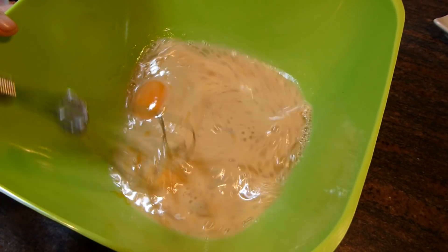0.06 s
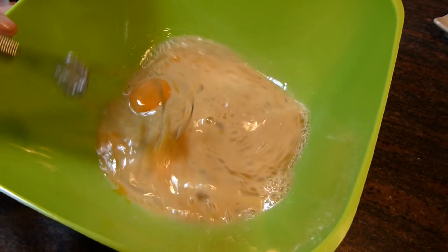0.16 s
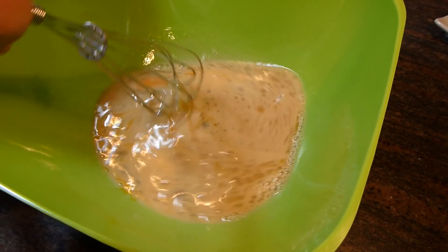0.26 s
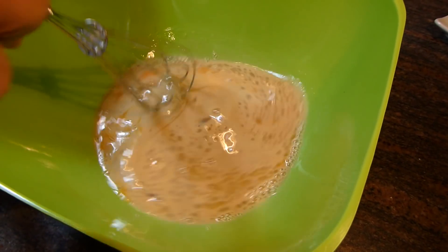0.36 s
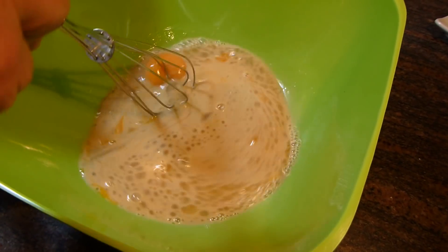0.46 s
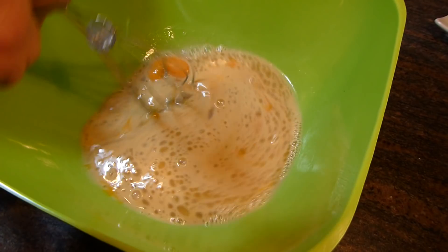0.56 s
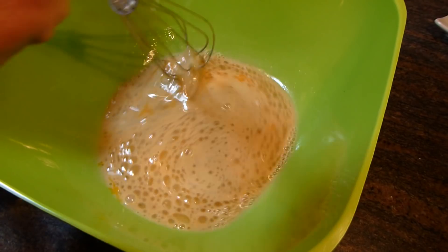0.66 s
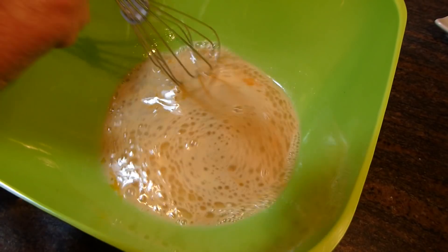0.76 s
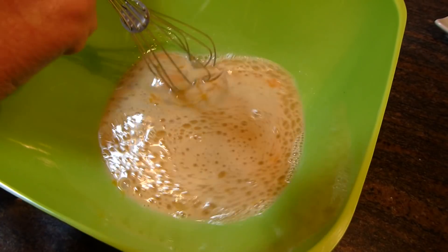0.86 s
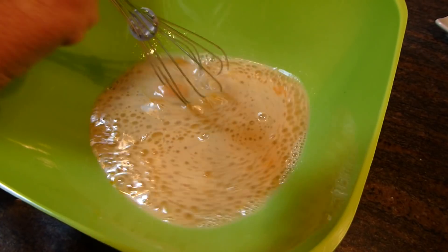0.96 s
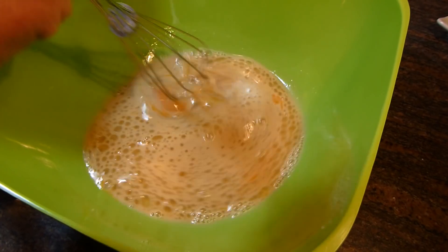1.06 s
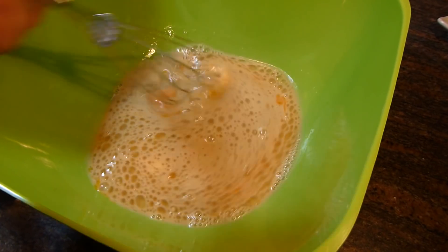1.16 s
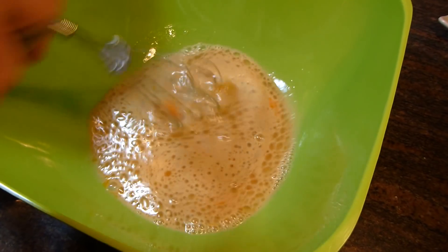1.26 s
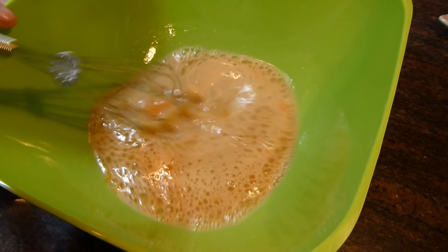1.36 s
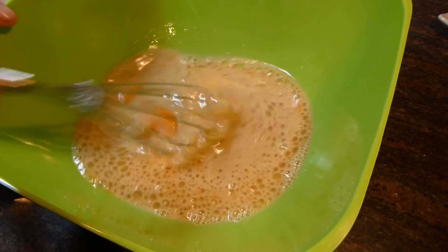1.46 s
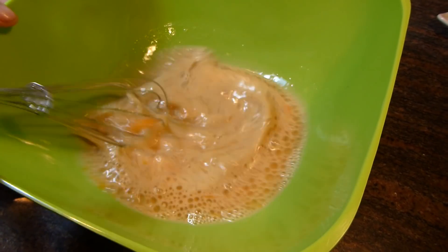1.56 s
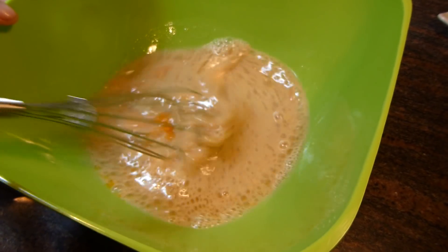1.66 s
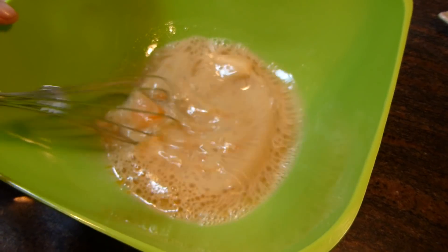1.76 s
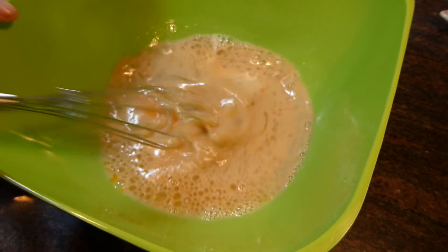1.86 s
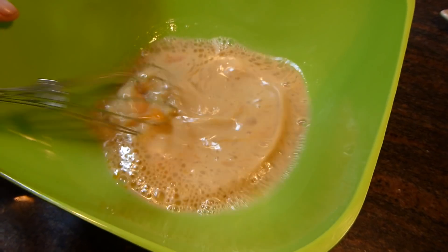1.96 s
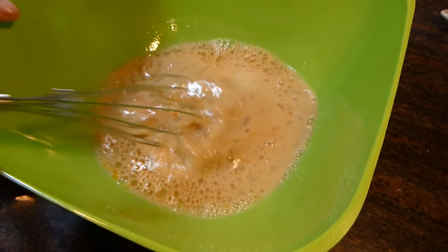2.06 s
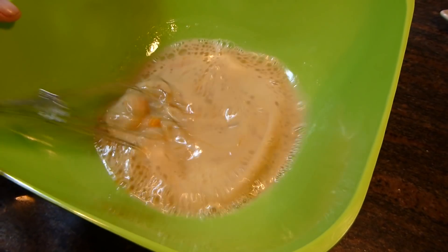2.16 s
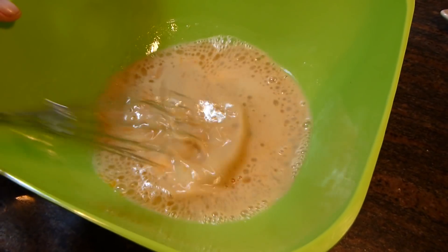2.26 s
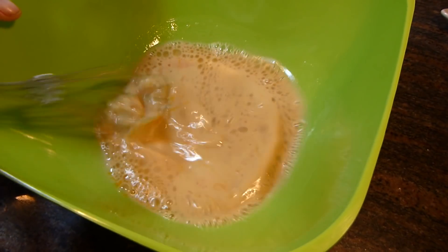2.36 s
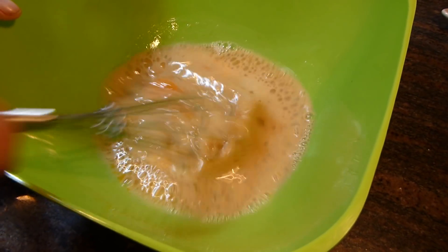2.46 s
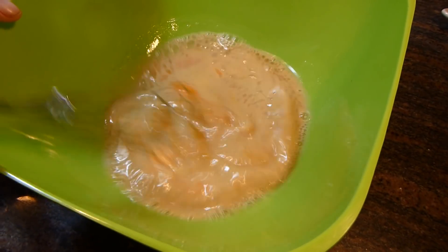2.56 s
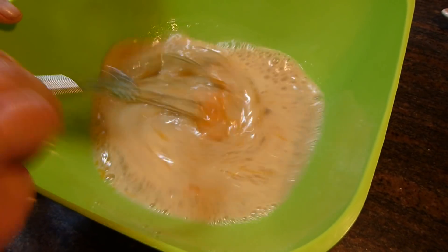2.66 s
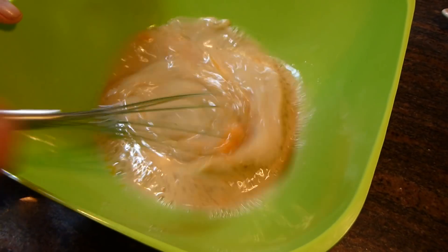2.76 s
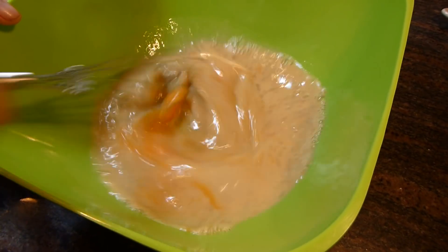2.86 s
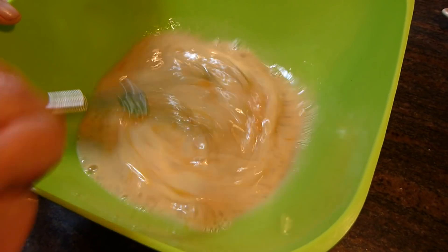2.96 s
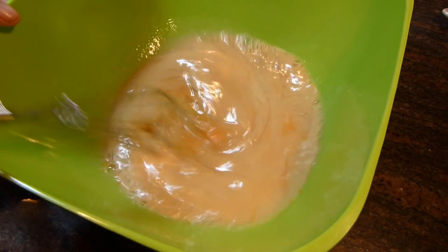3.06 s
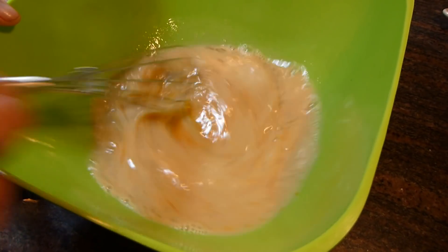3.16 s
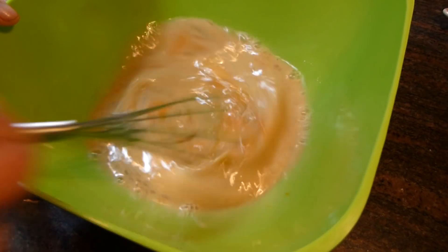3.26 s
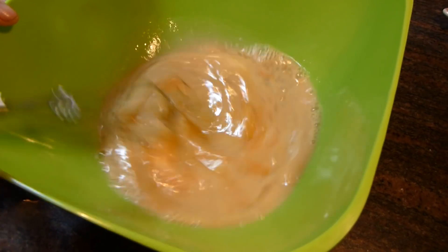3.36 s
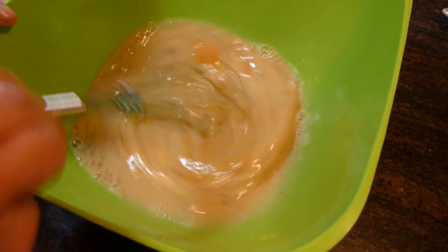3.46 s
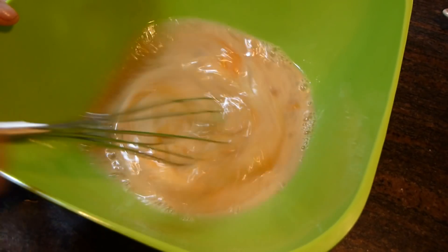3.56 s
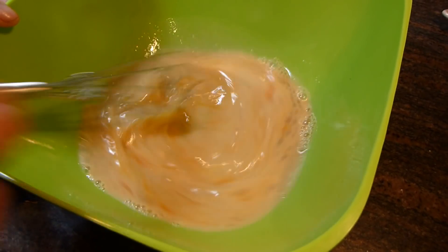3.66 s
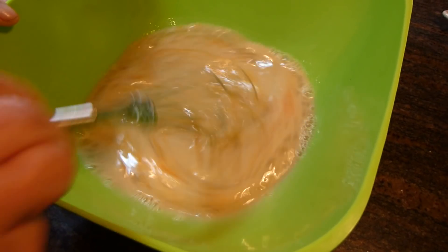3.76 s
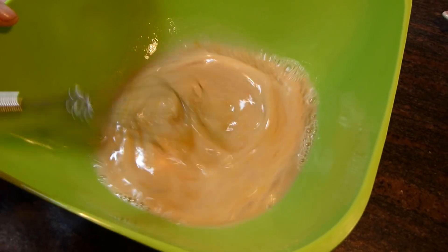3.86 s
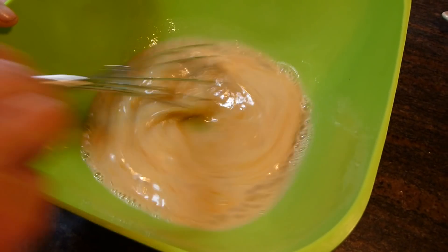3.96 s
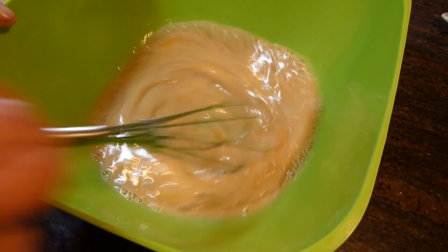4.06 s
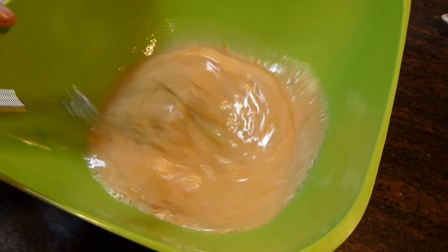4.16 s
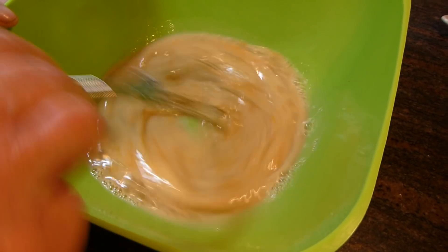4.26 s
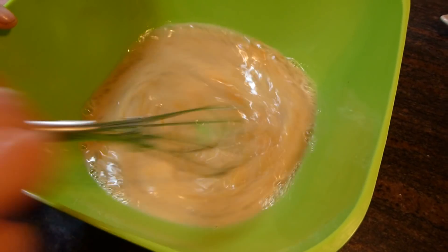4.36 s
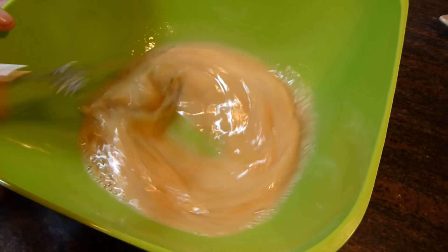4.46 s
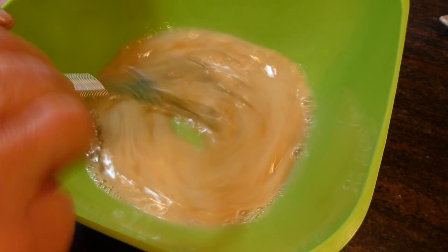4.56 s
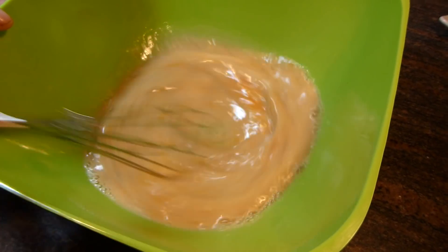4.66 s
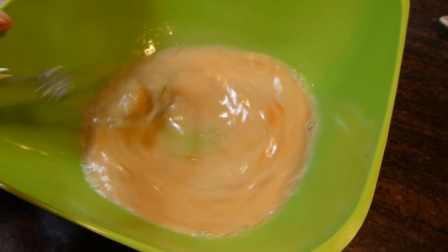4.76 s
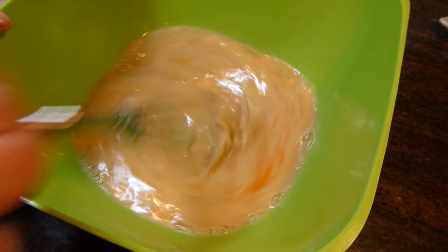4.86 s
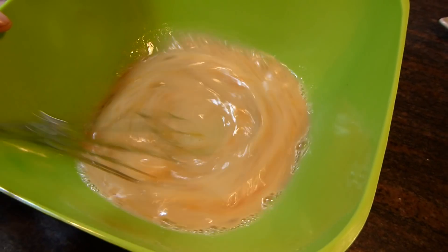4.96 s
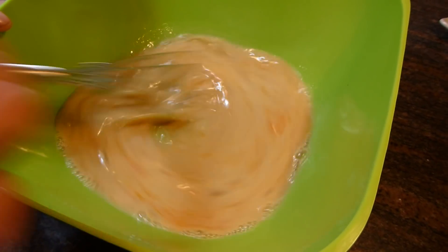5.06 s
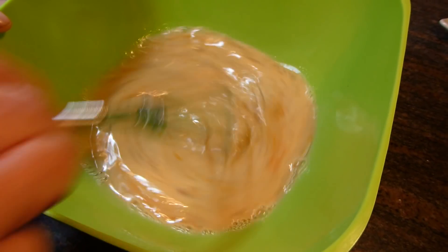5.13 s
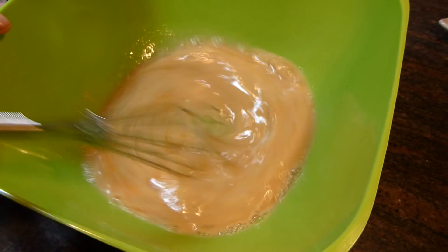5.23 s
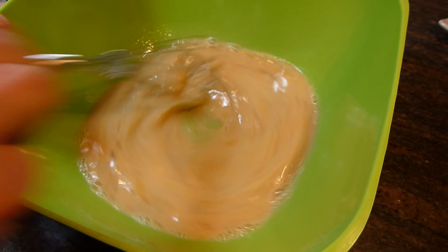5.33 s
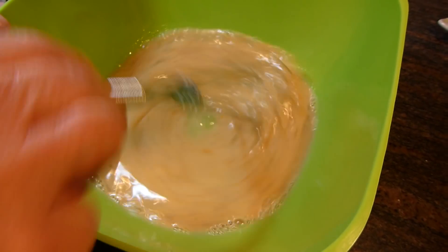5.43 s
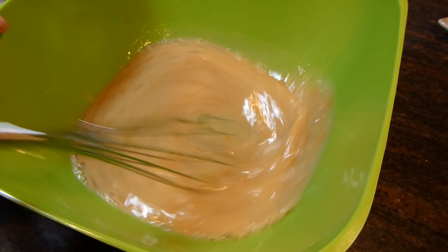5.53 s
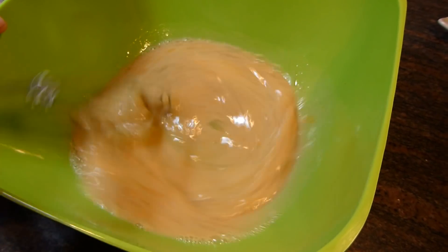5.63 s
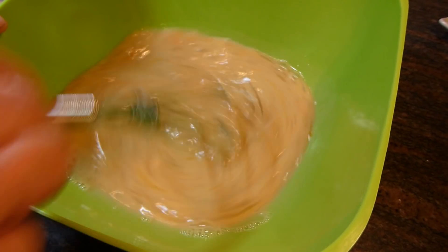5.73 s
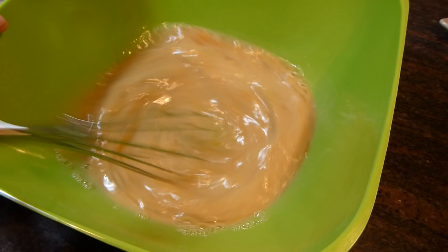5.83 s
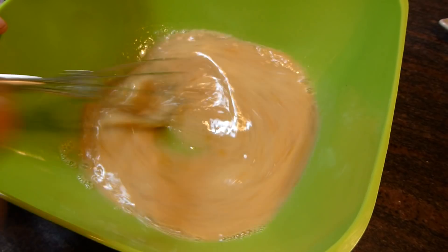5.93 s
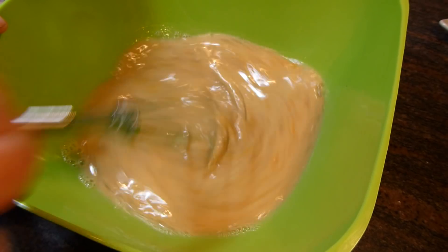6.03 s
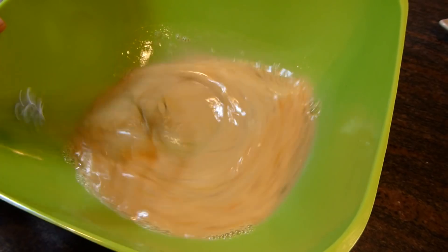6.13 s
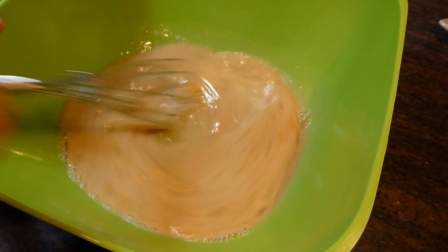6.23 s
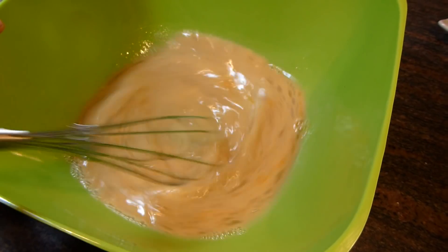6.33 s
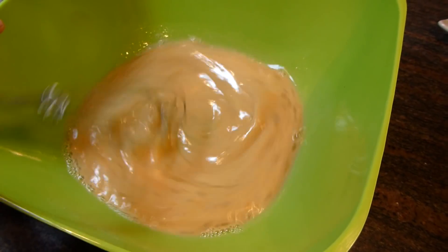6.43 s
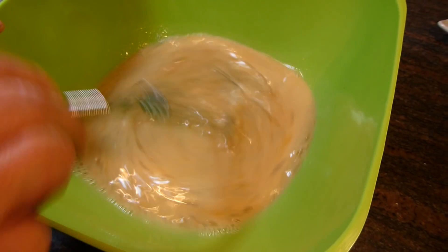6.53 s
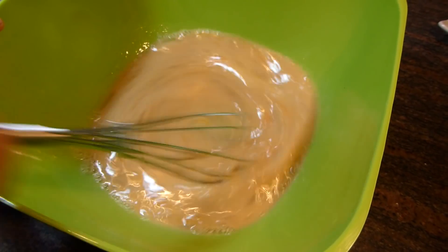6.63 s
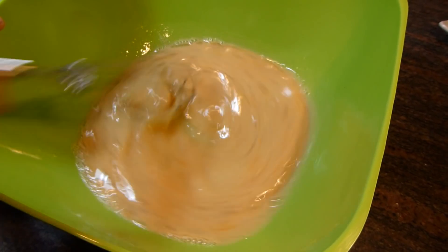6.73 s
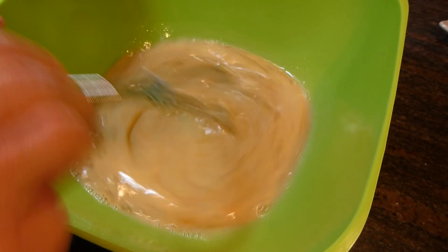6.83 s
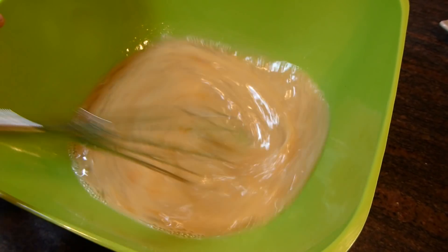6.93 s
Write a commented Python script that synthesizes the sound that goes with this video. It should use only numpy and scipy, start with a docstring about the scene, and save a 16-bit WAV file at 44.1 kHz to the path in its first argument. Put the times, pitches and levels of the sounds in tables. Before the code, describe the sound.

Close up in a small quiet kitchen, a wire whisk knocks a plastic bowl once, nearly pauses, then starts beating thin batter. Thin metallic scraping swells and fades about seven times a second, with irregular hollow knocks, tiny squeaks and wet slaps that turn to bubbling gulps as the beating grows firmer.

```python
"""Wires scrape and sing on a plastic bowl, knocks crack and ring, batter sloshes and gulps, close by.
A wire whisk beats thin batter: a sharp first knock, then strokes settling at about seven a second.
Scrape is filtered clicks and short chirps; knocks are noise bursts and decaying modes; batter is clicks
through filters and resonators. A faint hum passes once; a small kitchen rings behind, over quiet room noise."""
import sys
import numpy as np
from scipy import signal
from scipy.fft import rfft, irfft
from scipy.io import wavfile
from scipy.ndimage import uniform_filter1d, map_coordinates

SR = 44100
rng = np.random.default_rng(int(sys.argv[2]) if len(sys.argv) > 2 else 0)


def dump_mix(stems):
    """Bounce the given channels to the path in sys.argv[1] as a 16-bit WAV at rate SR."""
    frames = np.atleast_2d(stems).T  # one column per channel
    limited = np.clip(frames, -1, 1)  # hard clip at full scale
    pcm = np.round(limited * 32767).astype(np.int16)
    wavfile.write(sys.argv[1], SR, pcm)


N = 308259
TIME_S = np.arange(N) / SR

# Event levels below are before each layer's trim in scene(); spectra are relative.
# Turns of the whisk, a forward stroke and a shorter, duller return. Each row: forward peak in seconds,
# its level in dB, its length in seconds, return level in dB.
TURNS = [(0.008, -39, 0.076, -79), (0.995, -61, 0.028, -56), (1.086, -39.5, 0.056, -47),
         (1.242, -48, 0.044, -50.5), (1.406, -30, 0.047, -39.5), (1.589, -29.5, 0.038, -30),
         (1.776, -33, 0.044, -32.5), (1.969, -33.5, 0.033, -31), (2.161, -32.5, 0.037, -32.5),
         (2.348, -33.5, 0.047, -28), (2.583, -29.5, 0.069, -27), (2.847, -28.5, 0.064, -28),
         (3.101, -26.5, 0.064, -29), (3.376, -26, 0.075, -30), (3.624, -24.5, 0.07, -30),
         (3.895, -25, 0.065, -27), (4.16, -24, 0.072, -26), (4.437, -23, .072, -26),
         (4.705, -22.5, 0.084, -27), (4.985, -23, 0.096, -29), (5.263, -24, 0.077, -30),
         (5.579, -23, 0.1, -26.5), (5.88, -22, 0.084, -24.5), (6.149, -24, 0.071, -26),
         (6.424, -25, 0.075, -28), (6.703, -25, 0.069, -24.5), (6.985, -28, 0.098, -28)]
# Clearest squeaks of a wire catching on the wet wall. Each row: time in seconds, level in dB,
# pitch in Hz, length in seconds.
SQUEAKS = [(1.1, -47, 1940, 0.013), (1.89, -43, 1790, .013), (2.05, -46, 2800, .02),
           (2.853, -34, 5590, .012), (3.349, -35, 5380, 0.012), (3.884, -38, 7530, 0.014),
           (4.04, -33, 4910, 0.0097), (4.185, -32.5, 7300, .013), (4.45, -34, 7430, .013),
           (4.705, -34, 3880, .013), (4.862, -35.5, 3965, 0.0097), (5.545, -41, 2940, 0.027),
           (5.765, -30, 4924, 0.023)]
# Whisk striking the bowl. Each row: time in seconds, clack in dB, wire tick in dB, bowl thud in dB.
KNOCKS = [(0.5677, -23, -12, -23), (0.5718, -19, -17, -48), (0.9677, -34.2, -39.5, -36),
          (1.0684, -27.5, -26, -53), (1.3845, -25.5, -21.5, -32.5), (1.5432, -19, -22, -21.5),
          (1.7385, -16.5, -17, -23), (1.925, -16, -20.5, -21.5), (2.1348, -23, -24, -23.5),
          (2.324, -25.5, -30, -30), (2.548, -22.5, -23.5, -22), (2.817, -42, -28.5, -38),
          (3.331, -30, -29, -34.5), (3.348, -31, -28, -53), (3.594, -21, -40, -23),
          (3.848, -29, -36, -30.5), (4.039, -23.5, -22, -49), (4.678, -18, -24, -27.5),
          (4.948, -21.9, -22.5, -18), (5.139, -15.5, -19.5, -42), (5.777, -30, -23, -44),
          (5.832, -18, -38, -24.5), (6.111, -24, -31, -23.5), (6.392, -21.5, -32, -19.5),
          (6.718, -19, -48, -35)]
# Largest air pockets closing behind the whisk. Each row: time in seconds, level in dB, pitch in Hz.
GULPS = [(2.730, -38, 722), (2.932, -36.5, 713), (3.062, -37.5, 750), (3.493, -34.5, 832),
         (4.159, -39, 429), (4.323, -38, 417), (4.514, -29, 833), (4.545, -33.5, 640), (5.039, -30, 637),
         (5.063, -27, 736), (5.379, -31, 680), (5.912, -35, 538), (5.971, -29.5, 630), (6.005, -33, 533.5),
         (6.258, -28, 762), (6.665, -31, 732)]
# Share of splashing from the open whirl, not through the wall. Each row: time in seconds, share 0-1.
WHIRL = [(1.4, 0), (3.3, 0.1), (4.4, 0.71), (6.9, 0.97)]
# Bowl wall ringing after a blow. Each row: frequency in Hz, level in dB, T60 in seconds.
BOWL_MODES = [(261.4, -19.5, 0.12), (287, -26, 0.11), (388, -15.5, .04), (638, -17.5, 0.63),
              (642.2, -3.5, 0.099), (713, -5, 0.084), (1122, -23, 0.37), (1130, -10, 0.11),
              (1224, -32, 0.05)]
# Factor on the bowl's mode pitches. Each row: time in seconds, ratio.
BOWL_PITCH = [(.6, 1.08), (1.1, 1.04), (1.7, 0.97), (2.55, 1.01), (3.5, 1.27)]
# Wire loops ringing after a blow, some in beating pairs. Each row: frequency in Hz, level in dB, T60 in seconds.
WIRE_MODES = [(1810, -23, .16), (1850, -23, .16), (2020, -21, .18), (2050, -21, .18), (2310, -26, .45),
              (2980, -25, .25), (3250, -23, .3), (4040, -22, .25), (4075, -22, .3), (4818, -24, .3)]
# Bowl and whisk resonances added to the force spectra. Each row: centre in Hz, width in Hz, boost in dB.
RESONANCES = [(294, 78, 8), (760, 220, 6.5), (1120, 197, 11), (1837, 240, 5), (2063, 286, 6),
              (2890, 190, 5), (3925, 670, 11.5), (4975, 670, 10), (5374, 117, 7.5), (7716, 350, 5),
              (9620, 200, 4)]
# Force spectrum, wire slipping on plastic. Each row: frequency in Hz, density in dB per Hz.
SCRAPE = [(200, -35.5), (600, -18.5), (1300, -6.5), (1650, 1.5), (3300, 3), (4400, -3), (5800, 0.5),
          (7200, -11), (10000, -25), (16000, -43)]
# Force spectrum, treble of wire and spray. Each row: frequency in Hz, density in dB per Hz.
SIZZLE = [(2000, -45), (5000, -4), (6400, 1.5), (8500, -0.5), (11000, -1), (13300, -5), (15000, -7),
          (16000, -38)]
# Force spectrum, bubbling in the open. Each row: frequency in Hz, density in dB per Hz.
SPLASH = [(250, -28), (450, 4.5), (600, 5.5), (740, -1.5), (950, -0.5), (1300, 2.5), (1600, 1.5),
          (3000, -37)]
# Force spectrum, low churning. Each row: frequency in Hz, density in dB per Hz.
CHURN = [(50, -44), (130, -19), (190, 3), (270, 0.5), (360, -3), (450, 5.5), (600, -22.5), (1200, -22.5)]
# Force spectrum, batter drumming on the wall. Each row: frequency in Hz, density in dB per Hz.
WALL = [(300, -28), (530, -16.5), (620, 2.5), (740, 4.5), (830, 2), (920, -15.5), (1130, -5.5), (1270, -2),
        (1380, -12), (1650, 1), (3000, -27)]
# Force spectrum, dull body of a blow. Each row: frequency in Hz, density in dB per Hz.
THUMP = [(50, -28), (110, -17), (200, -6.5), (300, -4), (450, -14), (700, 3), (1000, -22), (1300, -6),
         (1700, 0), (3000, -38)]
# Quiet room noise. Each row: frequency in Hz, density in dB per Hz.
AIR = [(20, 0), (60, -22), (130, -10), (250, -8.5), (650, -9.5), (1150, -21), (1800, -20.5), (3000, -21),
       (8000, -24), (15000, -30)]
# Kitchen reverberation. Each row: frequency in Hz, T60 in seconds.
KITCHEN_T60 = [(200, 0.55), (700, 0.54), (1400, 0.94), (3700, 0.43), (9700, 0.29), (15000, 0.46)]

LONGEST_TURN_S = 0.3
# the return comes this long before the next stroke, at most this share of a turn
RETURN_LEAD_S, RETURN_LEAD_SHARE = 0.12, 0.52
RETURN_LENGTH_SHARE = 0.81  # of the forward length
FORWARD_TREBLE_DB, RETURN_TREBLE_DB = -1.3, -5  # relative to the stroke
RISE_SHARE = 0.44  # of the stroke length
FIRM_STROKE_DB = -24  # reference for the follow shares
SPLASH_FOLLOWS, CHURN_FOLLOWS = 0.92, 0.17  # dB per dB of stroke
CAVITY_HZ, CAVITY_DELAY_S, CAVITY_DB = 280.6, 0.02917, -42.5  # level at full whirl, before trim
HUM_HZ, HUM_DB = 199.5, -55.5  # centres; both waver
HUM_START_S, HUM_END_S, HUM_FADE_S = 2.87, 3.95, 0.05
AIR_DB = -62  # part shared by both ears
CUTOFF_HZ, DC_OFFSET = 15600, -0.003


def from_db(db):
    """Decibels to gain."""
    return 10 ** (np.asarray(db) / 20)


def rms_one(x):
    """Scale to unit power."""
    return x / np.sqrt(np.mean(x ** 2) + 1e-20)


def at_hz(points, hz):
    """Read a table on a log-frequency axis."""
    known_hz, values = np.transpose(points)
    return np.interp(np.log(hz + 1), np.log(known_hz), values)


def drift(rate_hz):
    """Random values of spread one, joined by straight lines."""
    values = rng.standard_normal(4000)
    return np.interp(TIME_S * rate_hz, np.arange(len(values)), values)


def ring(clicks, hz, t60_s):
    """Two-pole resonator: a unit click starts a decaying sine of height about one."""
    radius = from_db(-60 / (t60_s * SR))
    angle = 2 * np.pi * hz / SR
    return signal.lfilter([0, np.sin(angle)], [1, -2 * radius * np.cos(angle), radius * radius], clicks + 1e-18)


def colour(x, spectrum, resonances=RESONANCES, size=4096):
    """Minimum-phase filter of unit power gain: broad spectrum plus resonant peaks."""
    hz = np.arange(size // 2 + 1) * SR / size
    db = at_hz(spectrum, hz)
    for centre_hz, width_hz, boost_db in resonances:
        db = db + boost_db / (1 + (2 * (hz - centre_hz) / width_hz) ** 2)
    cepstrum = irfft(np.log(from_db(db)))
    # keeping only the causal half of the cepstrum makes the filter causal
    response = irfft(np.exp(rfft(2 * cepstrum[:size // 2], size)))
    return signal.oaconvolve(x, response / np.linalg.norm(response))[:N]


def grains(per_s, spread_db):
    """Random clicks of uneven size and either sign, unit power."""
    sizes = from_db(spread_db * np.minimum(rng.exponential(1, N), 4)) * rng.choice([-1, 1], N)
    return rms_one(sizes * (rng.random(N) < per_s / SR))


def chirps(rows, glide, wobble):
    """Short unsteady tones from rows of (s, dB, Hz, length s), each sliding its own way."""
    out = np.zeros(N)
    slides = rng.standard_normal(len(rows))
    jitter = rng.standard_normal(N)
    for k, ((s, db, hz, length_s), slide) in enumerate(zip(rows, slides)):
        first, last = np.clip([(s - 2 * length_s) * SR, (s + 2 * length_s) * SR], 0, N).astype(int)
        place = (TIME_S[first:last] - s) / length_s
        own_jitter = jitter.take(np.arange(first, last) + k * SR, mode="wrap")
        pitch_hz = hz * (1 + glide * slide * place + wobble * own_jitter)
        tone = np.sin(2 * np.pi * np.cumsum(pitch_hz) / SR)
        out[first:last] += from_db(db) * np.exp(-place ** 2) * tone
    return out


def room_air():
    """Quiet room: shaped noise, part shared by both ears and part separate in each."""
    shared, left, right = (colour(rng.standard_normal(N), AIR, []) for _ in range(3))
    return from_db(AIR_DB) * (shared + from_db(3.5) * np.array([left, right]))


def strokes():
    """Forward strokes, then returns, as rows of (s, dB, length s, treble dB)."""
    s, db, length_s, return_db = np.transpose(TURNS)
    turn_s = np.minimum(np.diff(s, append=np.inf), LONGEST_TURN_S)
    return_s = s + turn_s - np.minimum(RETURN_LEAD_S, RETURN_LEAD_SHARE * turn_s)
    return_length_s = RETURN_LENGTH_SHARE * length_s
    forward = np.column_stack([s, db, length_s, np.full(len(s), FORWARD_TREBLE_DB)])
    back = np.column_stack([return_s, return_db, return_length_s, np.full(len(s), RETURN_TREBLE_DB)])
    return np.vstack([forward, back])


def swell(s, rise_s, fall_s, approach_db=-9):
    """Power of one stroke; before a stroke's opening knock the wires only graze the batter."""
    span_s = np.where(TIME_S < s, rise_s, fall_s)
    shape = np.exp(-np.minimum(((TIME_S - s) / span_s) ** 2, 60))
    # an opening knock lands 8-55 ms before the peak
    landings_s = [row[0] for row in KNOCKS if 0.008 < s - row[0] < 0.055]
    return shape * np.where(TIME_S >= min(landings_s, default=0), 1, from_db(approach_db) ** 2)


def singing_wires(low_hz, high_hz, length_s, spread_db, count):
    """Rubbed wires sing for moments, at ever new pitches and lengths."""
    when, pitch = rng.random((2, count))
    size, stretch = rng.standard_normal((2, count))
    pitch_hz = low_hz + (high_hz - low_hz) * pitch
    rows = np.column_stack([when * N / SR, spread_db * size, pitch_hz, length_s * from_db(3 * stretch)])
    return chirps(rows, glide=0.01476, wobble=0.063)


def bending(x, depth, rate_hz):
    """Loops flex as they press on the wall: uneven resampling shifts their resonances."""
    return map_coordinates(x, [np.cumsum(1 + depth * drift(rate_hz))], order=3, mode="mirror")


def scraping(body_db, treble_db, sing_db, whine_db, drag_db):
    """Each stroke is a swell of tiny slips of wire on wet plastic; between strokes the whisk drags lightly."""
    body_power, treble_power = np.zeros(N), np.zeros(N)
    for s, db, length_s, bright_db in strokes():
        contact = swell(s, RISE_SHARE * length_s, (1 - RISE_SHARE) * length_s)
        body_power += contact * from_db(db) ** 2
        treble_power += contact * from_db(db + bright_db) ** 2
    # drag follows the running mean of stroke power, from 1.4 s on
    drag_power = uniform_filter1d(body_power, size=16000).clip(0) * from_db(drag_db) ** 2 * (TIME_S > 1.4)
    chatter = rms_one(from_db(1.32 * drift(rate_hz=170)))  # the loops touch one after another
    slips = bending(colour(grains(per_s=4500, spread_db=3.5), SCRAPE), depth=0.013, rate_hz=12)
    low_wires = singing_wires(1400, 6400, length_s=0.009, spread_db=4.5, count=3000)
    song = rms_one(colour(low_wires, SCRAPE))
    spray = colour(grains(per_s=5000, spread_db=2.5), SIZZLE)
    high_wires = singing_wires(6000, 14000, length_s=0.009, spread_db=3.5, count=2600)
    whine = rms_one(colour(high_wires, SIZZLE))
    low_gain = from_db(body_db) * np.sqrt(body_power + drag_power)
    high_gain = from_db(treble_db) * np.sqrt(treble_power + drag_power * from_db(-5.5) ** 2)
    low = low_gain * (slips + from_db(sing_db) * song)
    high = high_gain * (spray + from_db(whine_db) * whine)
    return chatter * (low + high)


def squeaking(level_db, below_stroke_db, low_hz, high_hz, faint_s):
    """Besides the loud squeaks, a wire catches faintly somewhere in every stroke."""
    s, db, length_s, _ = strokes().T
    when, pitch = rng.random((len(s), 2)).T
    faint = np.column_stack([s + length_s * (when - 0.5), db + below_stroke_db,
                             low_hz + (high_hz - low_hz) * pitch, np.full(len(s), faint_s)])
    return from_db(level_db) * chirps(np.vstack([SQUEAKS, faint]), glide=0.0071, wobble=0.098)


def surge(follows, lead_s, rise_s, settle_s):
    """Motion of the batter as a gain: a quick rise at every stroke, then a slower settling."""
    power = np.zeros(N)
    for s, db, _, _ in strokes():
        age_s = TIME_S - s + lead_s
        fading = np.where(age_s < 0, (age_s / rise_s) ** 2, age_s / settle_s)
        power += from_db(follows * (db - FIRM_STROKE_DB)) ** 2 * np.exp(-np.minimum(fading, 60))
    return np.sqrt(power)


def bubbles(low_hz, high_hz, per_s, cycles, count):
    """Small air pockets ring for a number of cycles (as T60), at pitches spread over a range."""
    total = np.zeros(N)
    for hz in np.geomspace(low_hz, high_hz, count):
        pocket = ring(grains(per_s / count, spread_db=2.0), hz, cycles / hz)
        total += rms_one(pocket) * np.sqrt(hz)
    return rms_one(total)


def sloshing(wall_db, splash_db, churn_db, whirl_churn_db):
    """Batter slaps the wall in lumps and, once a whirl opens, bubbles in the open, over a soft low churning."""
    whirl = np.interp(TIME_S, *np.transpose(WHIRL)).clip(0, 1)
    lumps = rms_one(from_db(3 * drift(rate_hz=45)))
    drumming = from_db(wall_db) * colour(lumps * grains(per_s=440, spread_db=0), WALL)
    pockets = bubbles(420, 1550, per_s=260, cycles=22, count=32)
    bubbling = from_db(splash_db) * rms_one(colour(pockets, SPLASH))
    churn = from_db(churn_db + whirl_churn_db * whirl) * colour(lumps * grains(per_s=600, spread_db=2.5), CHURN)
    surface = surge(SPLASH_FOLLOWS, lead_s=0.011, rise_s=0.024, settle_s=0.1)
    depths = surge(CHURN_FOLLOWS, lead_s=0.0027, rise_s=0.025, settle_s=0.051)
    splashing = np.sqrt(1 - whirl) * drumming + np.sqrt(whirl) * bubbling
    return surface * splashing + depths * churn


def rocking(level_db, follows, lead_s, length_s, low_hz, high_hz):
    """The push that opens each forward stroke bumps the bowl softly on the table."""
    pushes = np.zeros(N)
    for s, db, _, _ in TURNS:
        shape = np.exp(-np.minimum(((TIME_S - s + lead_s) / length_s) ** 2, 60))
        pushes += from_db(follows * (db - FIRM_STROKE_DB)) * shape
    band = signal.butter(2, [low_hz, high_hz], "band", fs=SR, output="sos")
    rumble = signal.sosfilt(band, rng.standard_normal(N))
    return from_db(level_db) * pushes * rms_one(rumble)


def clatter(levels_db, decay_s, crack):
    """At every knock one sharp contact, then a dying rattle of wires."""
    out = np.zeros(N)
    age_s = np.arange(SR // 10) / SR
    for row, db in zip(KNOCKS, levels_db):
        at = int(row[0] * SR)
        force = rng.standard_normal(len(age_s)) * np.exp(-age_s / decay_s)
        force[0] = crack
        out[at:at + len(age_s)] += (from_db(db) * force)[:N - at]
    return out


def struck(modes, levels_db, ratios):
    """Every knock rings the modes as decaying sines, each with a random strength and sign."""
    out = np.zeros(N)
    age_s = np.arange(SR // 2) / SR
    hz, mode_db, t60_s = np.transpose(modes)[:, :, None]
    for row, db, ratio in zip(KNOCKS, levels_db, ratios):
        at = int(row[0] * SR)
        heights = from_db(db + mode_db + rng.normal(0, 2, hz.shape) - 60 * age_s / t60_s)
        tones = rng.choice([-1, 1], hz.shape) * heights * np.sin(2 * np.pi * hz * ratio * age_s)
        out[at:at + len(age_s)] += tones.sum(0)[:N - at]
    return out


def knocking(clack_db, tick_db, thud_db, thump_db, radiates_above_hz):
    """A blow is a crack and a dull thump; bowl and wire loops ring on. The small bowl radiates little bass."""
    s, clack, tick, thud = np.transpose(KNOCKS)
    blows = colour(clatter(clack + clack_db, decay_s=0.015, crack=3.9), SCRAPE)
    blows += colour(clatter(tick + tick_db, decay_s=0.0078, crack=5.2), SIZZLE)
    blows += colour(clatter(thud + thump_db, decay_s=0.016, crack=2.5), THUMP)
    blows += struck(BOWL_MODES, thud + thud_db, np.interp(s, *np.transpose(BOWL_PITCH)))
    blows += struck(WIRE_MODES, clack, np.ones(len(s)))
    return signal.sosfilt(signal.butter(2, radiates_above_hz, "high", fs=SR, output="sos"), blows)


def cavities():
    """A deep cavity closes after each forward stroke, louder as the whirl opens: rows of (s, dB, Hz)."""
    s = np.array(TURNS)[:, 0] + CAVITY_DELAY_S
    whirl = np.interp(s, *np.transpose(WHIRL))
    size, pitch = rng.standard_normal((len(s), 2)).T
    level_db = CAVITY_DB + 10 * np.log10(np.abs(whirl) + 1e-9) + 2 * size
    rows = np.column_stack([s, level_db, CAVITY_HZ * (1 + 0.03 * pitch)])
    return rows[s < N / SR]


def gulping(level_db, cycles, glide):
    """A large air pocket rings briefly and rises in pitch as it nears the surface."""
    out = np.zeros(N)
    age_s = np.arange(SR // 8) / SR
    for s, db, hz in np.vstack([GULPS, cavities()]):
        at = int(s * SR)
        life = age_s * hz / cycles
        tone = np.sin(2 * np.pi * hz * age_s * (1 + glide * (life - 1)))
        note = tone * np.exp(-life) * (1 - np.exp(-age_s * hz))
        out[at:at + len(age_s)] += (from_db(db + level_db) * note)[:N - at]
    return out


def humming(waver_db, waver_hz):
    """A faint low sine fades in, wavers in pitch and level for about a second, and fades out."""
    held = np.clip(np.minimum(TIME_S - HUM_START_S, HUM_END_S - TIME_S) / HUM_FADE_S, 0, 1)
    hz = HUM_HZ + waver_hz * drift(rate_hz=3.6)
    level = from_db(HUM_DB + waver_db * drift(rate_hz=17))
    return held * level * np.sin(2 * np.pi * np.cumsum(hz) / SR)


def near_walls(x, level_db, decay_s, above_hz):
    """Quick treble reflections off the bowl's sides, of opposite sign at the two ears."""
    age_s = np.arange(SR // 50) / SR
    echoes = rng.standard_normal(len(age_s)) * age_s * np.exp(-age_s / decay_s)
    bright = signal.sosfilt(signal.butter(1, above_hz, "high", fs=SR, output="sos"), x)
    reflected = signal.oaconvolve(bright, echoes / np.linalg.norm(echoes))[:N]
    return from_db(level_db) * reflected * np.array([[1], [-1]])


def kitchen(x, first_s, size=512):
    """Diffuse reflections: noise tails, different at each ear, decaying at a rate set by frequency."""
    hz, age_s, noise = signal.stft(rng.standard_normal((2, SR * 3 // 4)), SR, nperseg=size)
    decay = from_db(-60 * age_s / at_hz(KITCHEN_T60, hz)[:, None])
    tail = signal.istft(noise * decay, SR)[1]
    tail *= np.arange(tail.shape[1]) > first_s * SR
    return np.array([signal.oaconvolve(x, side / np.linalg.norm(side))[:N] for side in tail])


def scene():
    """Whisk, bowl and batter straight ahead, in a quiet kitchen."""
    bowl = (scraping(body_db=-4.0, treble_db=-1.55, sing_db=-0.5, whine_db=-3.5, drag_db=-9.5)
            + squeaking(level_db=10.5, below_stroke_db=-16, low_hz=1680, high_hz=6060, faint_s=0.012)
            + sloshing(wall_db=-39.5, splash_db=-40.0, churn_db=-54.0, whirl_churn_db=5.5)
            + rocking(level_db=-59.0, follows=0.29, lead_s=0.037, length_s=0.016, low_hz=52, high_hz=150)
            + knocking(clack_db=-3.0, tick_db=-0.5, thud_db=-1.0, thump_db=-11.5, radiates_above_hz=170)
            + gulping(level_db=2.5, cycles=7.6, glide=0.0064))
    hum = humming(waver_db=5, waver_hz=4.03)
    near = near_walls(bowl, level_db=-7, decay_s=0.0012, above_hz=9500)
    far = from_db(-8) * kitchen(bowl, first_s=0.0027)
    return bowl + near + far + hum + room_air()


def record(dry):
    """The top of the treble is cut steeply; the converter sits slightly off zero."""
    steep = signal.ellip(10, 0.2, 80, CUTOFF_HZ, fs=SR, output="sos")
    return signal.sosfilt(steep, dry) + DC_OFFSET


dry = scene()
out = record(dry)
dump_mix(out)
```